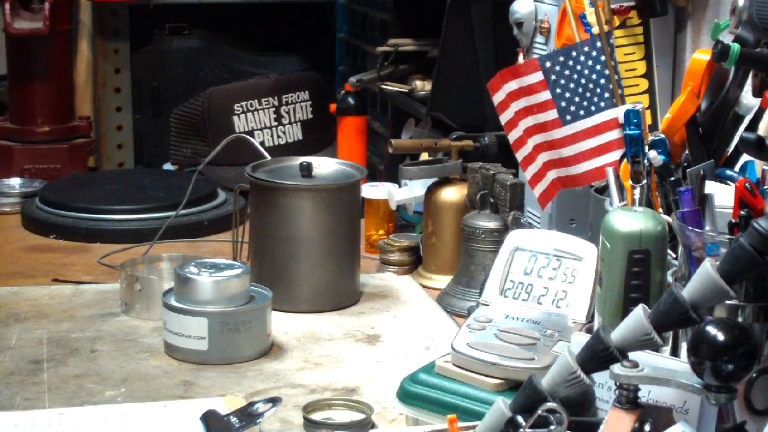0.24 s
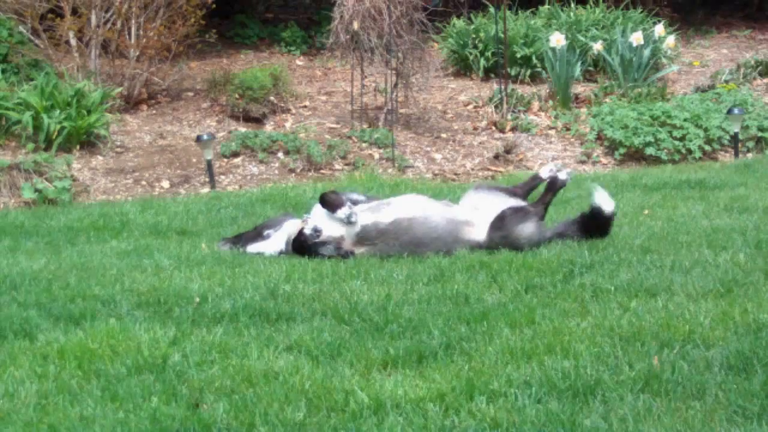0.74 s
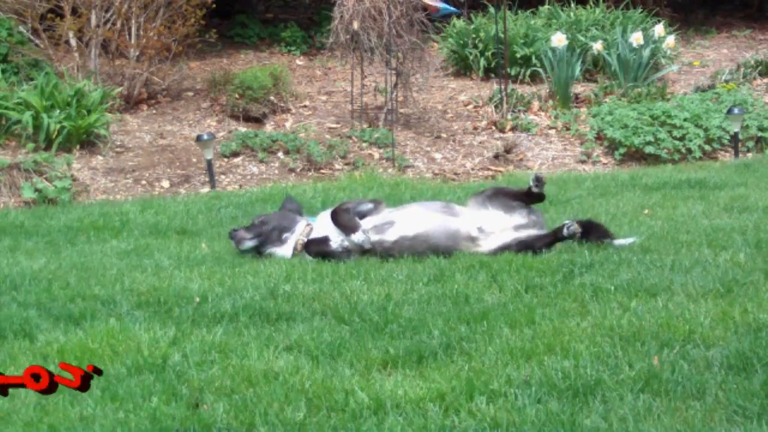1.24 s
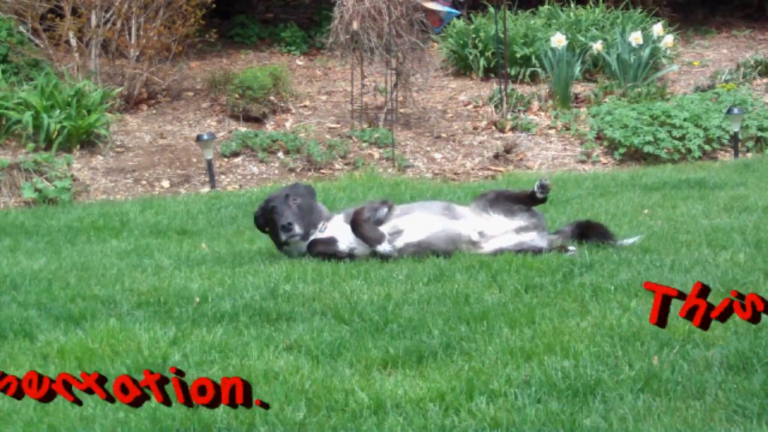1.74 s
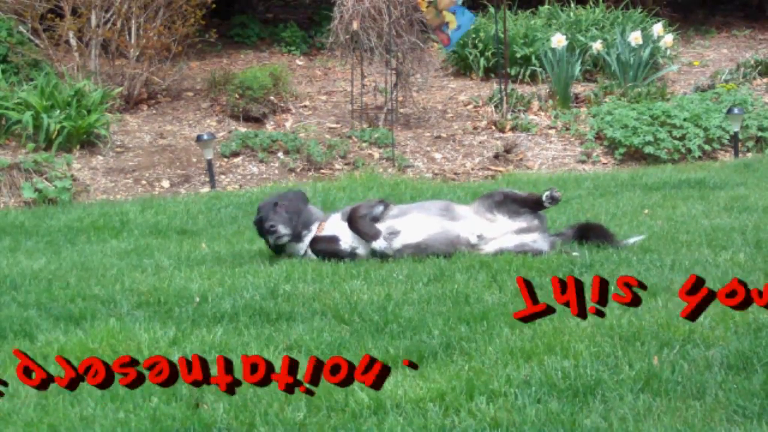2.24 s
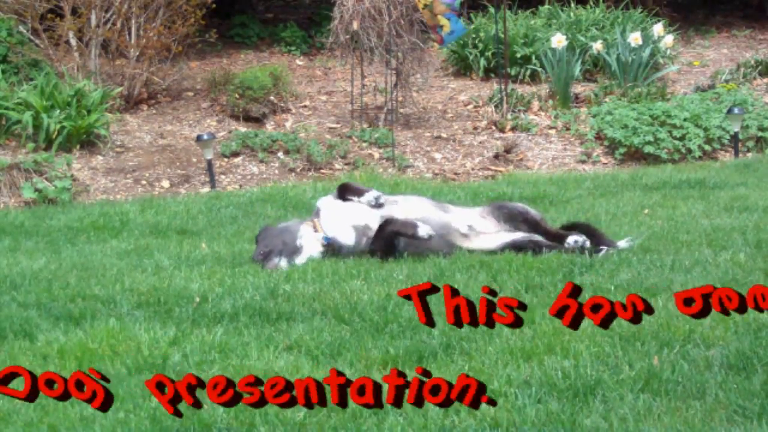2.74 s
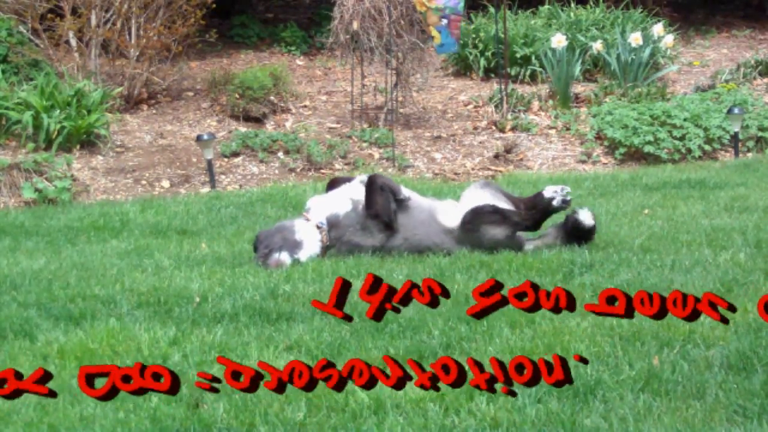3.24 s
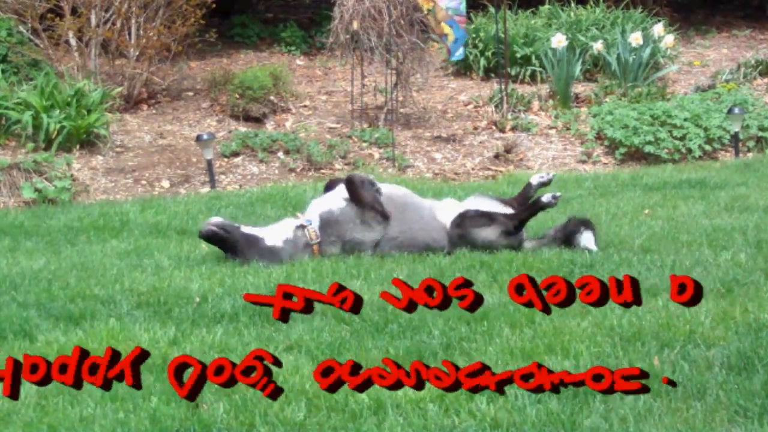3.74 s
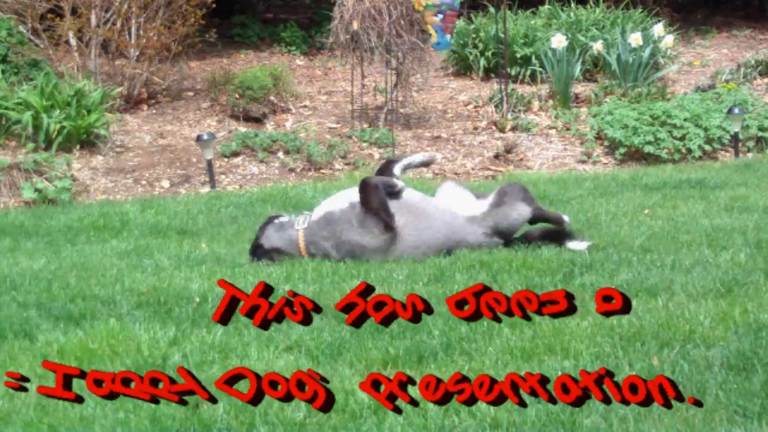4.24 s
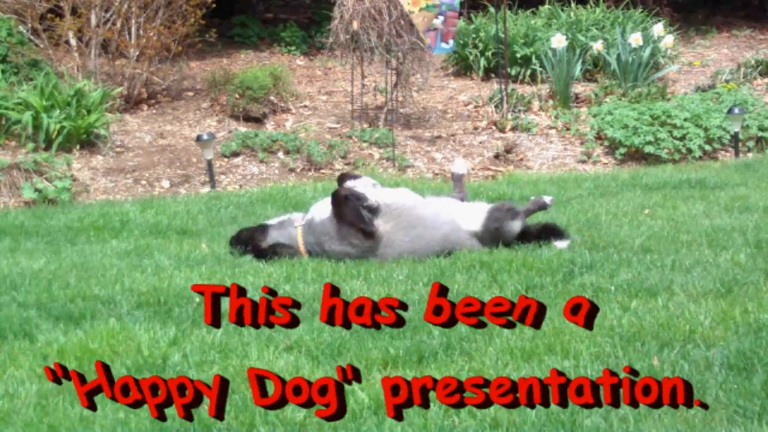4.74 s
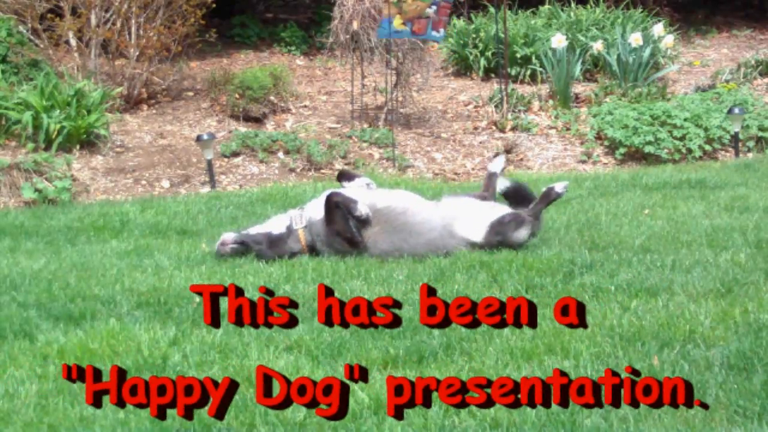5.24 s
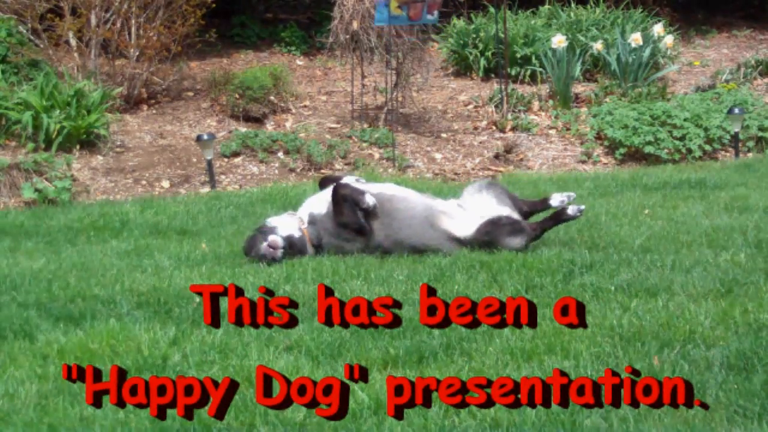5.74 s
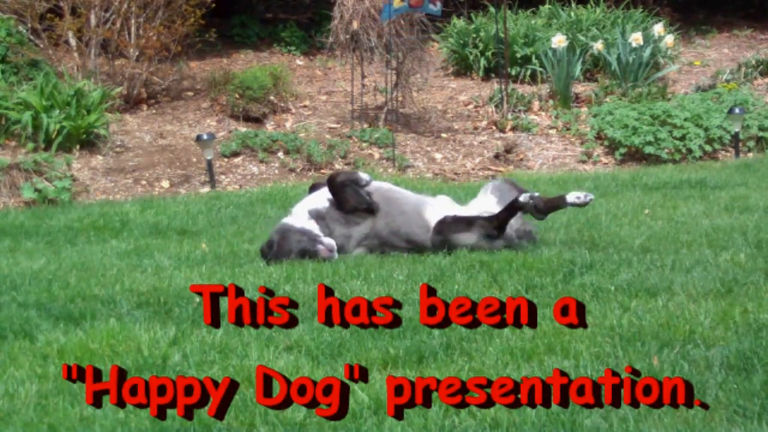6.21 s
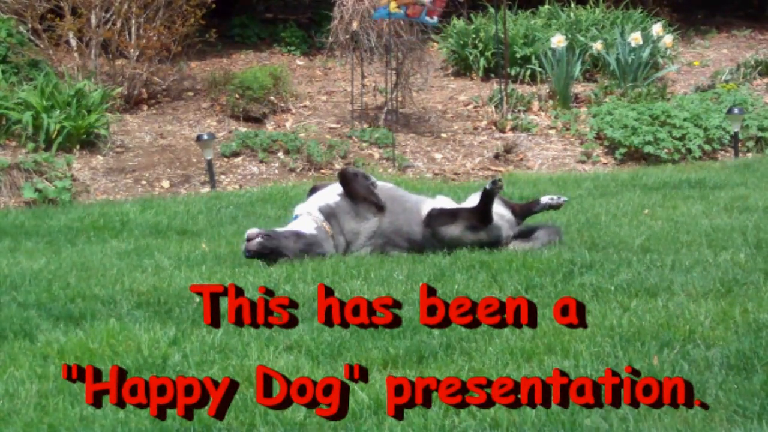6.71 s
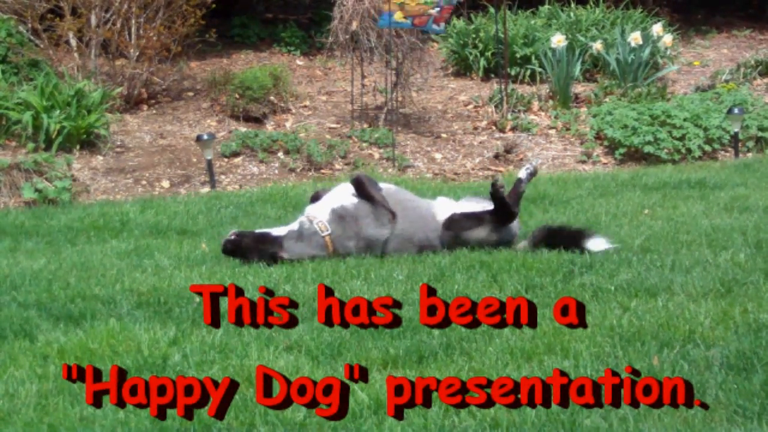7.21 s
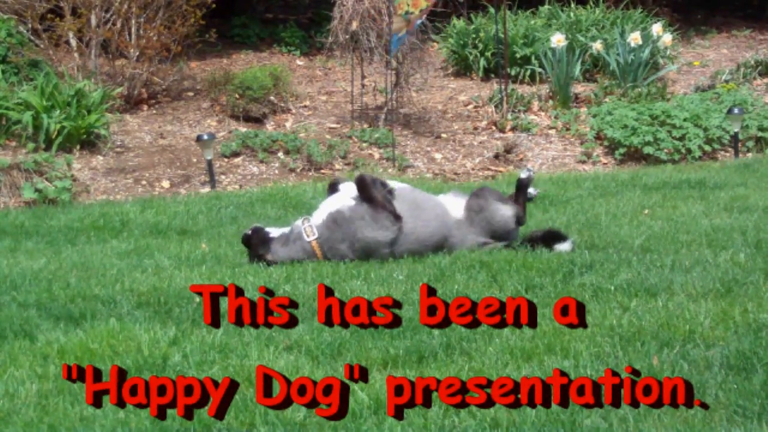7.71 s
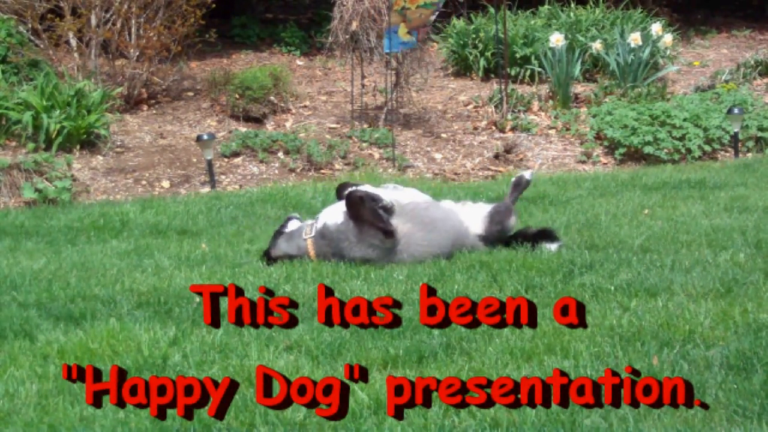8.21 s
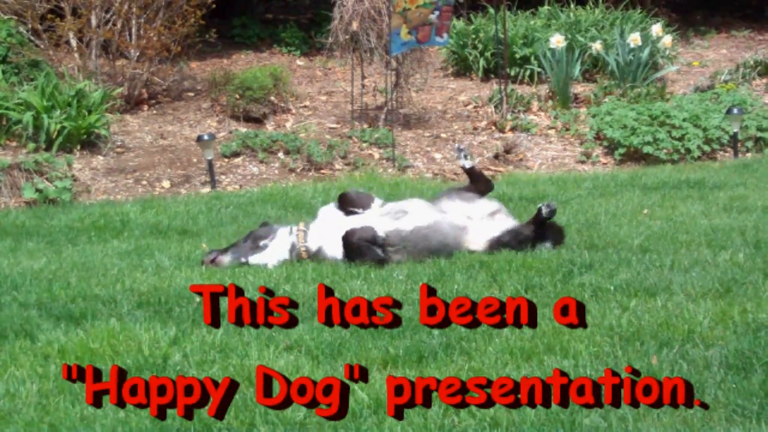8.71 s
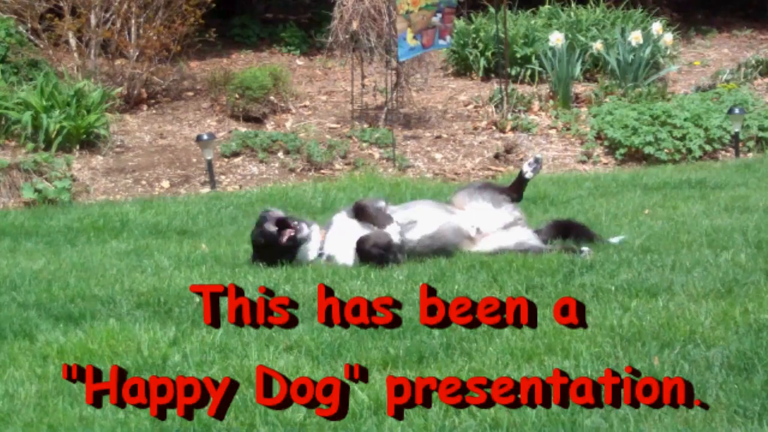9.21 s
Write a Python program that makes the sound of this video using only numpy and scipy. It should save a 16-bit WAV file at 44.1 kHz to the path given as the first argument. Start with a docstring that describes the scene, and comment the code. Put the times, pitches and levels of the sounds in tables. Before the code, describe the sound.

A low workshop hum stops dead, a tiny tick follows, then many small songbirds whistle, twitter and scold in an echoing spring garden.

```python
"""A workshop hums for a moment: steady low sines over dull noise. It stops, and after an instant of silence
a short ringing tick cuts in a spring garden, its soft noise hiss and a haze of blurred song.
Songbirds whistle "tee-oo" phrases, gliding notes and twitters, each a warbling near-sine; sliding bands of
pulsing noise make harsh calls; a small bird runs off thin chips, mostly rising, some falling, from time to time.
Every bird is smeared by echoes from trees and walls; random slurs of further birds join in until the end."""
import sys
import numpy as np
from scipy import signal
from scipy.fft import rfft, irfft, next_fast_len
from scipy.io import wavfile
from scipy.ndimage import map_coordinates

SR = 44100
rng = np.random.default_rng(int(sys.argv[2]) if len(sys.argv) > 2 else 0)


def store_wav(level_fs):
    """Save 16-bit WAV to argv[1]."""
    pcm = np.round(np.clip(np.atleast_2d(level_fs), -1, 1) * 32767)
    wavfile.write(sys.argv[1], SR, pcm.T.astype(np.int16))


N = 417186
TIME = np.arange(N) / SR
WORKSHOP_END_S, GARDEN_START_S = .844, .865
WORKSHOP_TOP_HZ, TOP_HZ = 7250, 15800
WARBLE, WARBLE_DOUBLES_DB = .012, 6.5  # share of pitch; it doubles with this much more scatter


def whistle(length_s, pitches_hz, swell_db, warble, rise_s=0.0038, warble_rate=240, flutter_db=4,
            full_flutter=0.018, arch=0.18, second_db=-34, third_db=-37, hoarse_rate=1100):
    """The syrinx glides along one arc of pitch and warbles round it: almost a sine, with faint hoarse overtones."""
    n = int(max(length_s, .01) * SR)
    u = np.linspace(0, 1, n)
    # one smooth curve through all the given pitches
    count = len(pitches_hz)
    arc = np.polyfit(np.linspace(0, 1, count), pitches_hz, count - 1)
    hz = np.polyval(arc, u)
    phase = 2 * np.pi * np.cumsum(hz * (1 + warble * walk(n, warble_rate))) / SR
    tone = np.sin(phase)
    # pure notes are even in level and poor in overtones; warbled ones flutter
    strain = np.clip(warble / full_flutter, 0, 1)
    for k, db in enumerate((second_db, third_db), 2):
        overtone = np.sin(k * phase) * (k * hz < TOP_HZ)
        hoarseness = 0.97 + walk(n, hoarse_rate)
        tone += undb(db) * (.5 + strain) * overtone * hoarseness
    flutter = strain * flutter_db * walk(n, 150.3)
    effort = np.abs(np.sin(np.pi * u)) ** arch * undb(swell_db * (u - .5) + flutter)
    return tone * effort * fade(n, rise_s, 0.0032)


def sing(out, echo_shape, s, length_s, pitches_hz, db, wet_db, pan_db, swell_db=0, rise_share=.18, trim_db=-1.37):
    """One whistled note fades in from a tree; the more it is scattered, the more it wavers."""
    warble = WARBLE * 2 ** (wet_db / WARBLE_DOUBLES_DB)
    note = whistle(length_s, pitches_hz, swell_db, warble, rise_share * length_s)
    add(out, s, outdoors(note, echo_shape, db + trim_db, wet_db, pan_db, 0.62))


SAG_HZ_PER_S, HOLD_SWELL_DB = 1350, 1.5  # the held note sinks and grows a little
SLUR_START, SLUR_SWELL_DB = 0.96, -7  # the slur starts at this share of the held pitch, and fades
# "tee-oo" phrases, a held note from which a slur falls away; levels are before sing's trim:
# (start_s, hold_s, pitch_hz, level_db, slur_start_s, slur_length_s, slur_end_hz, slur_level_db,
#  repeat_after_s, repeat_over_slur_db, scattered_over_direct_db, left_minus_right_db)
TEE_OO_PHRASES = [(1.012, .138, 3410, -39.5, 1.075, .05, 1780, -44.5, 0.058, -5, -0.5, 1),
                  (4.202, .125, 3335, -34.5, 4.25, .18, 2376, -35, .07, -11.5, 5, 0),
                  (4.954, .18, 3190, -35.5, 4.98, .12, 2454, -40, .06, -8, 0, -0.5),
                  (5.99, .085, 3393, -38.5, 6.055, 0.069, 2400, -39, .07, -7, -2.5, -3),
                  (9.023, .085, 3218, -31.5, 9.08, .062, 2290, -37.5, .05, -12, -3, 0)]


def tee_oos(echo_shape):
    """A held note slowly sinks; a fading slur drops away from it and comes again more softly."""
    out = np.zeros((2, N))
    for (s, hold_s, hz, db, slur_at, slur_s, low_hz, slur_db,
         repeat_s, repeat_db, wet_db, pan_db) in TEE_OO_PHRASES:
        held = [hz, hz - SAG_HZ_PER_S * hold_s]
        sing(out, echo_shape, s, hold_s, held, db, wet_db, pan_db, HOLD_SWELL_DB)
        sagged_hz = hz - SAG_HZ_PER_S * (slur_at - s)
        slur = [SLUR_START * sagged_hz, low_hz]
        for start, level_db in ((slur_at, slur_db), (slur_at + repeat_s, slur_db + repeat_db)):
            sing(out, echo_shape, start, slur_s, slur, level_db, wet_db, pan_db, SLUR_SWELL_DB, rise_share=.08)
    return out


# single whistled notes, levels before sing's trim:
# (start_s, length_s, start_hz, middle_hz, end_hz, level_db, scattered_over_direct_db, left_minus_right_db)
WHISTLED_NOTES = [(1.212, 0.12, 2705, 2550, 3230, -51.5, 1.5, -8),
                  (1.435, .038, 2510, 2304, 2020, -46, 4, 2.5),
                  (1.475, 0.084, 2330, 2900, 3054, -36, 1.5, 3),
                  (1.52, 0.084, 2620, 2746, 2495, -38.5, 0, -2),
                  (1.686, .035, 2466, 2560, 2480, -38.5, -3, 1),
                  (1.837, .049, 3090, 2920, 3040, -51.5, -10, -11),
                  (2.034, .05, 3500, 3050, 2870, -50.5, 0.5, -12),
                  (2.459, .028, 2770, 3170, 3490, -48, 2.5, -11),
                  (2.493, .03, 3150, 3710, 3350, -55, 1, -5), (2.648, .047, 3000, 2970, 2790, -48.5, 8, -2),
                  (2.711, 0.046, 2610, 3100, 3340, -42.5, 2, -7),
                  (2.767, 0.04, 2717, 2736, 2670, -48.5, 4, -9),
                  (3.036, 0.084, 3020, 3058, 3110, -51.5, 0, -1),
                  (3.698, .032, 3710, 3840, 3970, -50, 1, 2.5),
                  (3.718, .11, 3205, 3114, 3048, -33.5, -3.5, 2),
                  (3.818, 0.056, 2640, 2645, 2613, -37, 1, -0.5),
                  (4.544, 0.03, 2880, 2810, 2750, -45, -17, -2),
                  (4.784, .07, 5050, 4710, 4510, -45.5, 6, -0.5),
                  (4.845, 0.034, 2560, 2590, 2340, -38.5, -2, 2.5),
                  (5.076, .03, 2900, 2400, 2200, -43, 1, 0), (5.148, .05, 2530, 2730, 2860, -43, -1.5, -4),
                  (5.209, 0.086, 4450, 4750, 4940, -47, 0.5, -1.5),
                  (5.496, .033, 2560, 2600, 2770, -42, -6.5, 0),
                  (5.547, .053, 2990, 2996, 2246, -36.5, -3, -1),
                  (5.717, 0.075, 3246, 3000, 2800, -48.5, -4, -10),
                  (5.921, 0.044, 3563, 3325, 3490, -36.5, -5, -2),
                  (6.19, 0.049, 2904, 2620, 2374, -45.5, 3.5, 0),
                  (6.544, 0.051, 3610, 3200, 2660, -45, 0, 2.5),
                  (6.575, .04, 2640, 3000, 2280, -36.5, -11, -2),
                  (6.687, .072, 2370, 2450, 2600, -48, 2, 3), (6.81, .052, 2377, 2800, 3110, -37, 3, 3.5),
                  (6.857, 0.051, 3480, 2900, 2330, -34, 6, -2.5),
                  (6.88, 0.0546, 2750, 3088, 2970, -39, 3.5, 1),
                  (6.967, 0.077, 2767, 2850, 2420, -35.5, -13, -2),
                  (7.143, .108, 2720, 2868, 2912, -35.5, -8.5, -4.5),
                  (7.294, .1, 4750, 4860, 5020, -50.5, 9, -6),
                  (7.6, 0.061, 2900, 2600, 2450, -49.5, 3.5, -2),
                  (7.623, 0.03, 3350, 2810, 2490, -51, 6, -8), (7.7, 0.058, 3173, 3376, 3493, -47, 3, -1),
                  (8.3, .068, 3230, 3440, 3620, -47, 4, -5), (8.397, 0.028, 2664, 2620, 2720, -48, 5, -4),
                  (8.75, .088, 2946, 3460, 2960, -46, -4, -13.5),
                  (8.827, .08, 3000, 2856, 2724, -46, 4.5, -6),
                  (9.32, .07, 2930, 2750, 2455, -40.5, -6.5, -1.5),
                  (9.417, .042, 2766, 2694, 2570, -43, -8, -3)]
# a further bird's soft low notes, all of one shape, levels before sing's trim: (start_s, pitch_hz, level_db)
SOFT_LOW_NOTES = [(1.61, 2165, -48.5), (2.35, 2407, -52.5), (2.553, 2090, -56), (2.92, 2040, -55),
                  (3.79, 2235, -46), (4.87, 2260, -48.5), (6.51, 1984, -55), (6.61, 2220, -51.5),
                  (6.76, 2235, -50.5), (6.96, 2138, -50), (7.6, 2150, -56), (8.95, 2130, -50.5),
                  (9.19, 2007, -50)]
LOW_NOTE_S, LOW_NOTE_SAG, LOW_NOTE_WET_DB = .08, .018, 3.5  # length; share by which the pitch sinks; scatter
# notes of one quick twitter, levels over the twitter's own: (delay_s, length_s, start_hz, middle_hz, end_hz, level_db)
TWITTER_NOTES = [(0, .065, 3540, 4220, 4720, 0.5), (.072, .028, 4500, 3950, 3500, -2),
                 (0.119, .028, 3530, 4350, 3360, -1), (.295, .028, 4700, 4320, 4000, -3.5)]
# when the twitter comes, levels before sing's trim: (start_s, level_db)
TWITTER_TIMES = [(3.326, -57.5), (8.208, -52)]


def songbirds(echo_shape, twitter_wet_db=-6, twitter_pan_db=-2):
    """Single whistles, soft low notes and twitters from the trees, all gliding near-sines."""
    out = np.zeros((2, N))
    for s, length_s, *pitches_hz, db, wet_db, pan_db in WHISTLED_NOTES:
        sing(out, echo_shape, s, length_s, pitches_hz, db, wet_db, pan_db)
    for s, hz, db in SOFT_LOW_NOTES:
        sinking = hz * (1 + LOW_NOTE_SAG * np.array([.5, -.5]))
        sing(out, echo_shape, s, LOW_NOTE_S, sinking, db, LOW_NOTE_WET_DB, 0)
    for s, db in TWITTER_TIMES:
        for delay_s, length_s, *pitches_hz, note_db in TWITTER_NOTES:
            sing(out, echo_shape, s + delay_s, length_s, pitches_hz, db + note_db, twitter_wet_db, twitter_pan_db)
    return out


def rasp(length_s, start_hz, end_hz, width_hz, pulse_hz=130, pulse_db=4, skirt=2.8, skirt_db=-8,
         wander=.6, rise_s=0.0097):
    """The syrinx vibrates chaotically: a sliding, wandering band of sound with wide skirts, in uneven pulses."""
    n = int(max(length_s, .01) * SR)
    core, wide = (walk(n, 2 * hz) + 1j * walk(n, 2 * hz) for hz in (.85 * width_hz, skirt * width_hz))
    hz = np.linspace(start_hz, end_hz, n) + wander * width_hz * walk(n, 70)
    carrier = np.exp(2j * np.pi * np.cumsum(hz) / SR)
    band = ((core + undb(skirt_db) * wide) * carrier).real
    buzz = band * undb(pulse_db * walk(n, 2 * pulse_hz))
    # a small beak radiates nothing low
    beak = signal.butter(6, 2100, "high", fs=SR, output="sos")
    return signal.sosfilt(beak, buzz * fade(n, rise_s, 0.0081))


# bands of each harsh call, before the call's stretch and level; width_hz is a nominal half width:
# (delay_s, length_s, start_hz, end_hz, width_hz, level_db)
SCOLD_BANDS = [(0, .07, 5650, 5750, 850, -49), (.015, .13, 7160, 6930, 411, -49.5),
               (.012, .075, 9380, 9400, 348, -58), (.015, .155, 11330, 10900, 600, -61.5),
               (.02, .22, 3452, 3003, 600.5, -48), (0.139, .064, 6050, 4400, 500, -54)]
CHURR_BANDS = [(0, .085, 7090, 6810, 648, -52.5), (.012, .13, 8060, 8010, 120, -61.5),
               (.015, .12, 11230, 10970, 401, -59), (.025, .13, 5103, 4457, 439, -48.5),
               (.06, .17, 3600, 3100, 360, -51)]
WHINE_BANDS = [(0, .087, 6190, 5200, 799, -56.5), (.01, .087, 3160, 2916, 570, -54),
               (.015, .057, 8100, 8210, 530, -60.5), (.028, .054, 11030, 11100, 270, -64),
               (.1, .25, 6900, 6895, 120, -58.5), (.122, .115, 9270, 9430, 300, -67),
               (.155, .14, 6240, 6250, 201, -61.5)]
# when each call sounds, levels added to those of its bands: (start_s, time_stretch, level_db, left_minus_right_db)
SCOLD_CALLS = [(2.091, 1.05, -.7, 0), (7.368, .97, 1.3, 0)]
CHURR_CALLS = [(4.785, .65, -3.5, 0), (5.47, 1.15, 0.5, 0), (6.21, 1.1, 0, -0.92), (9.045, .6, -6, -1)]
WHINE_CALLS = [(2.83, 1, 0.0047, 0), (8.08, 1.05, 0, -1)]
# the clear pip inside a scold or a whine, level before the call's and sing's trim:
# (delay_s, length_s, pitch_hz, level_db)
SCOLD_PIP, WHINE_PIP = (.146, .023, 4980, -45), (.058, 0.02, 4410, -44)


def harsh_calls(echo_shape, rasp_db=.5, rasp_wet_db=-2, pip_wet_db=-3):
    """Scolds, churrs and whines each sound their own rough bands; scolds and whines hold a clear pip."""
    out = np.zeros((2, N))
    for calls, bands in ((SCOLD_CALLS, SCOLD_BANDS), (CHURR_CALLS, CHURR_BANDS), (WHINE_CALLS, WHINE_BANDS)):
        for s, stretch, db, pan_db in calls:
            for delay_s, length_s, start_hz, end_hz, width_hz, band_db in bands:
                note = rasp(length_s * stretch, start_hz, end_hz, width_hz)
                # short waves scatter more, and reach the two microphones unlike each other
                wet_db = rasp_wet_db + start_hz / 2500
                likeness = .8 - start_hz / 9000
                heard = outdoors(note, echo_shape, db + band_db + rasp_db, wet_db, pan_db, likeness)
                add(out, s + delay_s * stretch, heard)
    for calls, (delay_s, length_s, hz, pip_db) in ((SCOLD_CALLS, SCOLD_PIP), (WHINE_CALLS, WHINE_PIP)):
        for s, _, db, pan_db in calls:
            sing(out, echo_shape, s + delay_s, length_s, [hz, hz], db + pip_db, pip_wet_db, pan_db)
    return out


# runs of evenly repeated chips, centre pitches and levels that each chip varies a little:
# (first_chip_s, end_s, period_s, start_hz, end_hz, level_db)
CHIP_RUNS = [(1.573, 1.82, 0.08, 4780, 4470, -65), (2.334, 3.7, 0.099, 5040, 5480, -65.5),
             (2.371, 3.65, 0.11, 6750, 7360, -68.5), (4.501, 5.15, 0.093, 5050, 5560, -61.5),
             (4.523, 5.2, 0.11, 6750, 7450, -68), (7.612, 8.5, .102, 5000, 5400, -59.5),
             (7.654, 8.12, 0.1, 6750, 7550, -68.5), (7.665, 7.92, 0.1, 4900, 2850, -51.5)]


def trills(echo_shape):
    """A small bird repeats one thin chip at an even pace, each a very short whistle that rises or falls."""
    out = np.zeros((2, N))
    for first_s, end_s, period_s, start_hz, end_hz, db in CHIP_RUNS:
        for s in np.arange(first_s, end_s, period_s):
            pitch, size = rng.standard_normal(2)
            chip = whistle(.024, np.array([start_hz, end_hz]) * (1 + .006 * pitch), 0, .005)
            add(out, s, outdoors(chip, echo_shape, db + 1.5 * size, -0.87, 0, 0.56))
    return out


def far_birds(echo_shape, from_s, centre_hz, range_octaves, length_s, db, count, slur_octaves=0.1492):
    """Birds further off: random slurs, mostly heard by their echoes."""
    out = np.zeros((2, N))
    chances = rng.uniform(-1, 1, (count, 6))
    for k, (when, pitch, bend, slide, size, side) in enumerate(chances):
        s = from_s + (N / SR - from_s) * (k + when) / count
        slur = slur_octaves * np.array([slide, bend / 2, -slide])
        pitches_hz = centre_hz * 2 ** (range_octaves * pitch + slur)
        note = whistle(length_s, pitches_hz, 0, .012)
        add(out, s, outdoors(note, echo_shape, db + 3 * size, 3, 3 * side, .6))
    return out


def tick(db=-42, ring_hz=190, decay_s=0.0022, snap_db=-3, snap_s=0.0036, dull_hz=3800):
    """A small dull tick as the garden cuts in: a dying low ring and a snap of dulled noise."""
    t = np.maximum(TIME - GARDEN_START_S, 0)
    dull = signal.butter(2, dull_hz, fs=SR, output="sos")
    noise = signal.sosfilt(dull, rng.standard_normal(N))
    snap = undb(snap_db) * np.exp(-t / snap_s) * unit(noise)
    ring = np.exp(-t / decay_s) * np.sin(2 * np.pi * ring_hz * t)
    return undb(db) * (ring + snap)


# relative spectrum of the garden's hiss: (frequency_hz, density_db)
GARDEN_SPECTRUM = [(30, -40), (100, -32), (250, -20), (450, -15), (750, -4.5), (1400, 1.5), (1900, 1),
                   (4000, 2), (5000, 0), (7000, -4.5), (8300, -7), (11300, -4.5), (12700, -8.5),
                   (15500, -10)]
# the hiss level over time, before its slight wavering and panning: (time_s, level_db)
AIR_LEVEL = [(.86, -64.5), (1.2, -61), (1.6, -59), (4, -59.5), (7, -58.5), (9.46, -58.5)]


def garden_air(haze_db=-58, pan_db=-3.0):
    """Soft outdoor hiss, and the blurred song of the neighbourhood near 3 kHz, both as coloured noise."""
    air_db = np.interp(TIME, *np.transpose(AIR_LEVEL))
    balance_db = np.array([[pan_db], [-pan_db]]) / 2
    hiss = coloured(GARDEN_SPECTRUM, 0.4, 6500) * undb(air_db + .5 * walk(N, 4) + balance_db)
    haze_points = [(1500, -45), (2150, -6.5), (2600, -8.5), (3150, -0.5), (3500, -11.0), (4200, -21.0)]
    haze = coloured(haze_points, 0.51, 13000)
    return hiss + haze * undb(haze_db + air_db - air_db.max() + 0.5 * walk(N, 3))


# workshop fan and mains lines, mean levels: (frequency_hz, level_db)
HUM_LINES = [(29.2, -49), (59.6, -54.5), (150, -79), (179.8, -65), (209.7, -72), (269.7, -75), (299.8, -77),
             (329.6, -76), (359.6, -76.5)]
# relative spectrum of the workshop's room noise: (frequency_hz, density_db)
WORKSHOP_SPECTRUM = [(8.8, -37), (15, -1.5), (37, -6.5), (67, -10.5), (140, -19.5), (186, -20.5),
                     (235, -25), (1840, -32.5), (2570, -33.5), (3870, -34.5), (5850, -35.5), (7000, -41),
                     (9100, -97), (15400, -120)]


def workshop(rumble_db=-51):
    """A fan's shaft lines and mains hum, as wavering sines, over dull room noise, alike in both channels."""
    hum = np.zeros(N)
    for hz, db in HUM_LINES:
        level = np.sqrt(2) * undb(db + 1.4 * walk(N, 5.85))
        phase = 2 * np.pi * hz * TIME + 0.26 * walk(N, 4.8) + rng.uniform(0, 2 * np.pi)
        hum += level * np.sin(phase)
    room = unit(coloured(WORKSHOP_SPECTRUM, 0.91, TOP_HZ)[0]) * undb(rumble_db)
    return low_pass(hum + room, WORKSHOP_TOP_HZ) * (TIME < WORKSHOP_END_S)


def foliage(near_t60_s=0.43, far_t60_s=1.29, far_db=-15, build_s=0.0033, clump_db=3):
    """Envelope of the echoes: near shrubs and walls answer in clumps and die fast, far trees linger."""
    t = np.arange(int(.8 * SR)) / SR
    decay = undb(-60 * t / near_t60_s) + undb(far_db - 60 * t / far_t60_s)
    return (1 - np.exp(-t / build_s)) * decay * undb(clump_db * walk(len(t), 297))


def outdoors(note, echo_shape, db, wet_db, pan_db, likeness):
    """A note arrives directly and by many scattered paths, drawn afresh for every note."""
    paths = spread(rng.standard_normal((2, len(echo_shape))), likeness) * echo_shape
    y = signal.fftconvolve(note[None], paths, axes=1)
    y *= undb(wet_db) * np.sqrt(2 * np.sum(note ** 2) / np.sum(y ** 2))
    y[:, :len(note)] += note
    # the level is the rms while the note itself lasts
    rms = np.sqrt(np.mean(y[:, :len(note)] ** 2))
    return y * undb(db + np.array([[pan_db], [-pan_db]]) / 2) / rms


def undb(db):
    """Decibels to gain."""
    return 10 ** (np.asarray(db) / 20)


def unit(x):
    """Scale to rms 1."""
    return x / np.sqrt(np.mean(np.abs(x) ** 2) + 1e-18)


def add(out, s, x):
    """Mix a stereo sound in at time s."""
    i = int(np.clip(s * SR, 0, N - 1))
    out[:, i:i + x.shape[1]] += x[:, :N - i]


def walk(n, rate):
    """Smooth chance that changes about rate times a second; spread near 1."""
    knots = rng.standard_normal(2048)
    return map_coordinates(knots, [np.arange(n) * rate / SR], order=3, mode="wrap")


def fade(n, rise_s, fall_s):
    """Rounded onset and ending."""
    t = np.arange(n) / SR
    rise = np.sin(np.pi / 2 * np.clip(t / rise_s, 0, 1))
    fall = np.sin(np.pi / 2 * np.clip((t[-1] - t) / fall_s, 0, 1))
    return rise * fall


def spread(pair, likeness):
    """Two unrelated signals become left and right with the given correlation, held between 0 and 1."""
    c = np.clip(likeness, 0, 1)
    mid, side = np.sqrt((1 + c) / 2) * pair[0], np.sqrt((1 - c) / 2) * pair[1]
    return np.array([mid + side, mid - side])


def coloured(points, likeness, apart_hz):
    """Stereo noise with the given spectrum; the channels drift apart above apart_hz."""
    size = next_fast_len(N)
    f = np.arange(size // 2 + 1) * SR / size + 1
    hz, db = np.transpose(points)
    pair = rfft(rng.standard_normal((2, size))) * undb(np.interp(np.log(f), np.log(hz), db))
    stereo = spread(pair, likeness / (1 + (f / apart_hz) ** 2))
    return unit(irfft(stereo, size)[:, :N])


def low_pass(x, hz):
    """Steep low-pass."""
    return signal.sosfilt(signal.ellip(10, .2, 80, hz, fs=SR, output="sos"), x)


def scene():
    """The workshop, an instant of silence, then the garden."""
    echo_shape = foliage()
    garden = tee_oos(echo_shape) + songbirds(echo_shape) + harsh_calls(echo_shape) + trills(echo_shape)
    garden += far_birds(echo_shape, from_s=1.3, centre_hz=2813, range_octaves=.2, length_s=.05, db=-60, count=90)
    garden += far_birds(echo_shape, from_s=2.4, centre_hz=4634, range_octaves=.2, length_s=.02, db=-66.5, count=100)
    garden += tick() + garden_air()
    return workshop() + garden * (TIME >= GARDEN_START_S)


def record(dry):
    """The recorder adds a trace of hiss and cuts the top."""
    hiss = undb(-91) * rng.standard_normal((2, N))
    return low_pass(dry + hiss, TOP_HZ)


dry = scene()
out = record(dry)
store_wav(out)
```